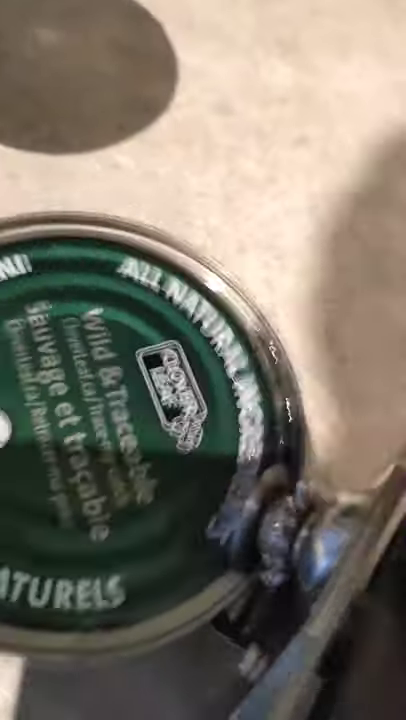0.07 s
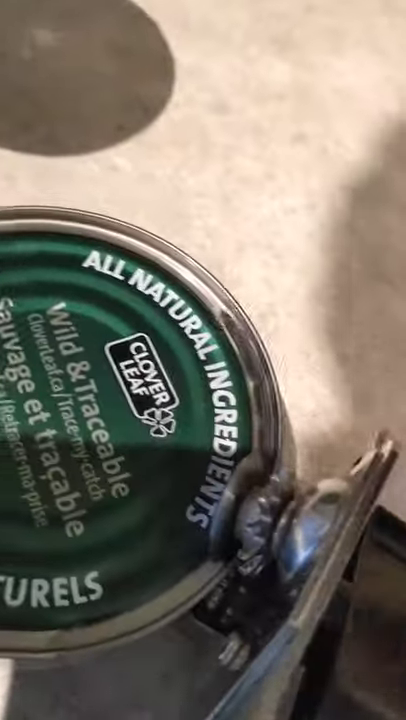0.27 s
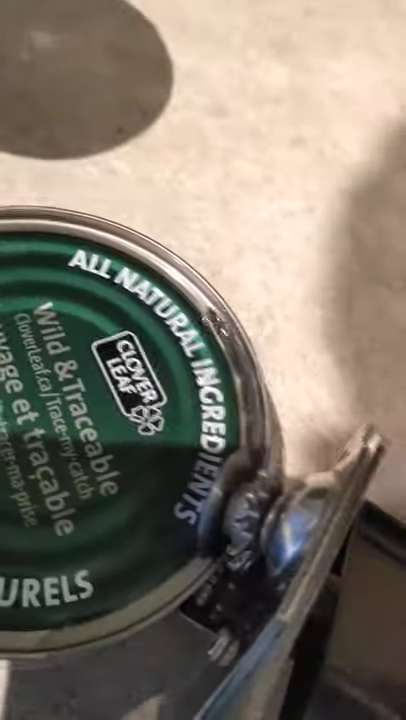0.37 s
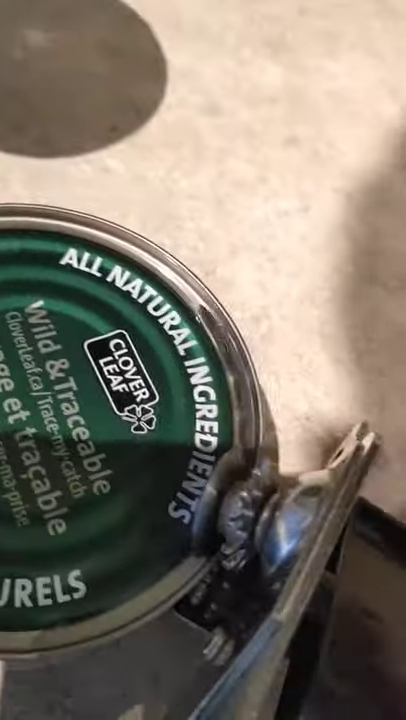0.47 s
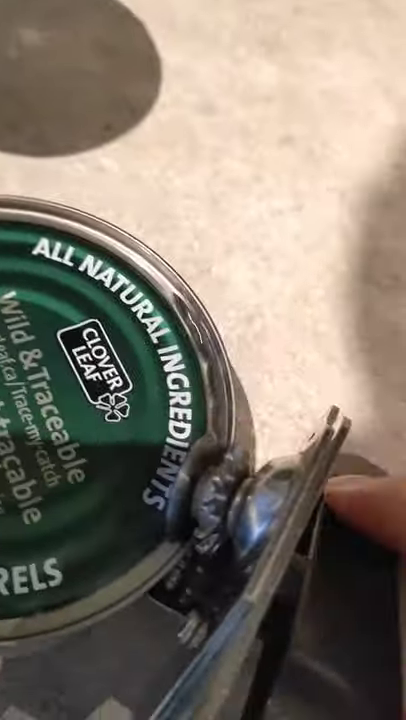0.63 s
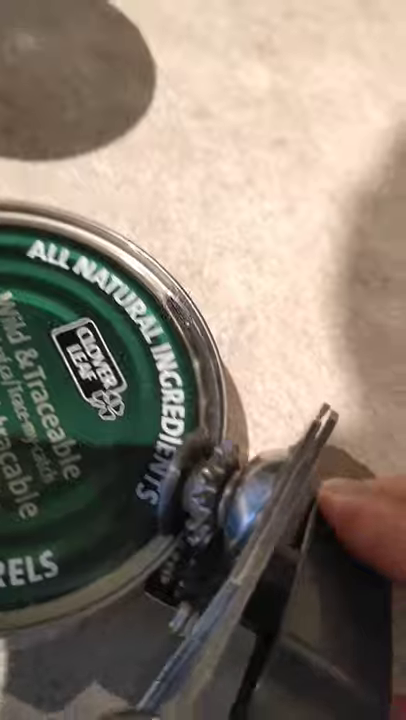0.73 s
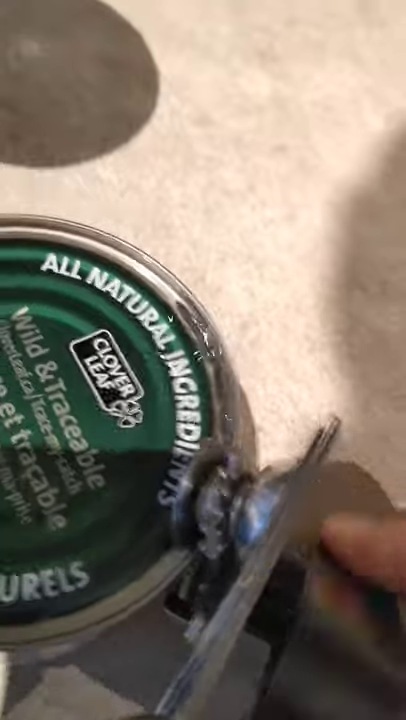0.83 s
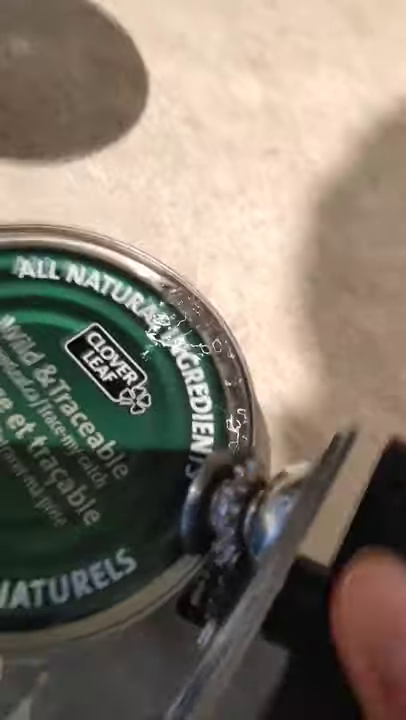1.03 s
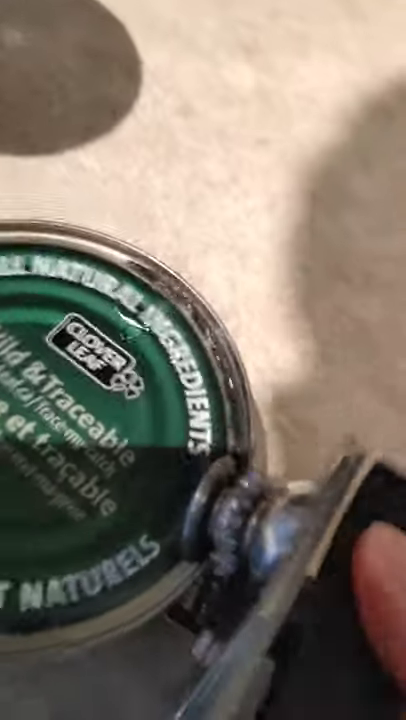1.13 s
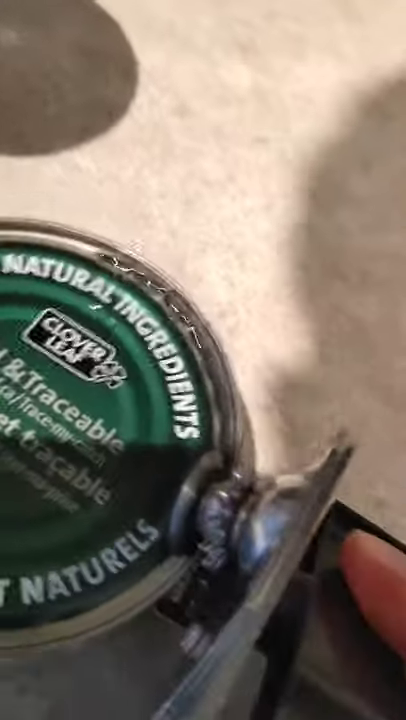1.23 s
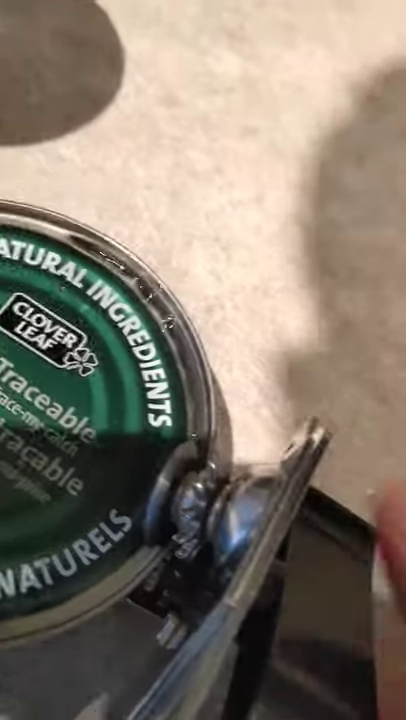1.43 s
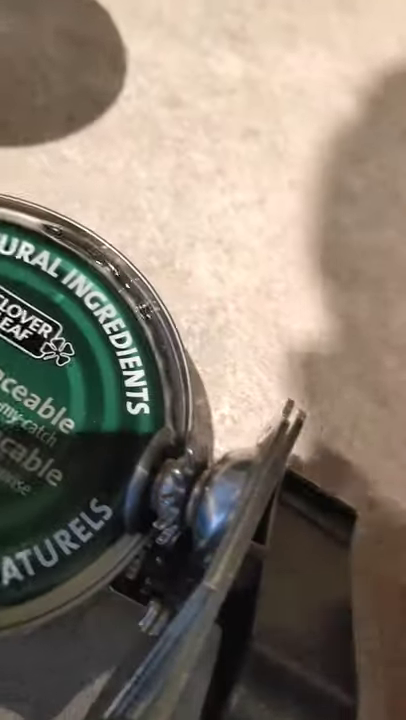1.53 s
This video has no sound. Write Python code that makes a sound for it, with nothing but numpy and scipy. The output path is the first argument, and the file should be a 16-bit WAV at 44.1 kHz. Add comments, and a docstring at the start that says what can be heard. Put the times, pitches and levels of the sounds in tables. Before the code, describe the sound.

A hand-turned can opener grinds through a tin lid with two loud snaps. In a pause the steel handle clinks and something rubs the microphone on the left, then a second turn crackles. The kitchen reverberates slightly.

```python
"""A hand-turned can opener works round a tin on a kitchen counter. In the first turn the wheel grinds
through the lid by stick-slip, and the tin crackles and twice snaps loudly, ringing the can's modes.
In the pause the loose steel handle clinks, something like a finger starts to rub and bump at the left
microphone, and the lid pops dully. A second turn grinds and crackles, and the handle clinks again.
Throughout, the kitchen reverberates and an appliance hums faintly."""
import sys
import numpy as np
from scipy import signal
from scipy.fft import rfft, irfft, next_fast_len
from scipy.io import wavfile
from scipy.ndimage import map_coordinates

SR = 44100
rng = np.random.default_rng(int(sys.argv[2]) if len(sys.argv) > 2 else 0)


def generate_wav(signal):
    """Clip the signal to [-1, 1] and save it as 16-bit WAV at the path in sys.argv[1]."""
    frames = np.transpose(np.atleast_2d(signal))
    scaled = np.clip(frames, -1, 1) * 32767
    pcm = np.round(scaled).astype(np.int16)
    wavfile.write(sys.argv[1], SR, pcm)


N = 70560

# force on the cutting wheel, as loudness: time_s, level_db
WHEEL_EFFORT = [(0, -43.5), (.05, -49), (.065, -39), (.12, -36.5), (.18, -45.5), (.23, -67), (.35, -46.5),
                (.39, -107), (.62, -63.5), (.67, -56.5), (.71, -90), (.88, -78), (.91, -49.5), (1.10, -46),
                (1.2, -42), (1.225, -46.5), (1.33, -59), (1.51, -121), (1.54, -51), (1.6, -72.5)]
# spectrum of shearing tin: frequency_hz, level_db
GRIND_SPECTRUM = [(35, -12.5), (100, 10.5), (350, -2), (1050, -1.5), (1700, -4.5), (2800, -9.5),
                  (3800, -6.5), (4900, -12.5), (7000, -5.5), (10000, -24.5), (16000, -34)]
# likeness of left and right for shearing and cracking: frequency_hz, coherence
TIN_COHERENCE = [(60, 0.22), (500, 0.64), (1600, 0.18), (5000, 0.044)]

def grinding():
    """Stick-slip friction: the wheel shears the tin in dense slips, louder as the force grows."""
    grains = np.array([slips(rate_hz=2400, spread_db=2) for _ in range(2)])
    level = amp(curve(WHEEL_EFFORT) + 4.54 * wobble(rate_hz=90))
    return level * coloured(paired(grains, TIN_COHERENCE), GRIND_SPECTRUM) * panned(11)


# the tin gives way: start_s, level_db
SNAPS = [(0.1249, -2.5), (0.1684, -3.5)]
# modes of the can and its lid: pitch_hz, level_db, t60_s
CAN_MODES = [(341, -18.5, 0.053), (468, -21.5, 0.038), (623, -15, 0.034), (982, -12, 0.038),
             (1248, -9.5, 0.027), (1442, -9, 0.032), (1852, -16.5, 0.043), (2215, -9, 0.016),
             (3860, -14.5, 0.017), (5430, -8.5, 0.02), (6870, -15.5, 0.018)]
# spectrum of a big tear: frequency_hz, level_db
TEAR_SPECTRUM = [(40, -30), (220, 0), (1300, 3.5), (2900, -4.5), (3900, -8), (4600, -9.5), (7000, -6.5),
                 (10000, -18), (16000, -35)]

def snaps():
    """Impulse excitation: a big tear cracks and sets the whole can ringing."""
    out = np.zeros((2, N))
    for start_s, level_db in SNAPS:
        body = ring(CAN_MODES, scatter_db=1, lag_s=.00009)
        tear = amp(-4.5) * crack(TEAR_SPECTRUM, t60_s=.016)
        add(out, start_s, amp(level_db - 4) * (body + tear))
    return out * panned(1.5)


# the wheel bites through a little more tin: start_s, ring_db, tick_db
BITES = [(.0582, -26.5, -28.5), (.0768, -37, -30), (.0978, -40, -29), (1.035, -37, -25),
         (1.111, -28, -29.5), (1.1187, -39, -24.5), (1.142, -28, -32), (1.1625, -32, -29.5),
         (1.171, -25.5, -23), (1.1845, -32, -28.5), (1.2032, -28, -23.5), (1.2105, -28, -23.5),
         (1.249, -32.5, -51), (1.2805, -35, -45)]
# modes of the rim under the wheel: pitch_hz, level_db, t60_s
RIM_MODES = [(643, -10, 0.041), (907, -8, 0.043), (1066, -11, 0.037), (1370, -9, 0.015)]
# spectrum of a sharp metal tick: frequency_hz, level_db
METAL_TICK_SPECTRUM = [(200, 4), (1200, -0.5), (2300, -12), (3800, 3.5), (5400, -9), (7000, -9),
                       (16000, -43)]
METAL_TICK_T60_S = .0083

def crackle():
    """Fracture in small steps: each bite ticks, then the rim resonates hollowly."""
    out = np.zeros((2, N))
    for start_s, ring_db, tick_db in BITES:
        hollow = ring(RIM_MODES, scatter_db=2, lag_s=.00009, attack_s=.0005)
        tick = crack(METAL_TICK_SPECTRUM, METAL_TICK_T60_S)
        add(out, start_s, amp(ring_db) * hollow + amp(tick_db) * tick)
    return out * panned(7)


# knocks of the handle: start_s, level_db, left_over_right_db, overtone_db
CLINKS = [(0.1197, -12, 18, -10.5), (.359, -27.5, 14, -6), (0.603, -34, 29.5, -8.5),
          (1.4642, -27.5, 15, -5), (1.4715, -21, 14, 1.5)]
# modes of the steel handle: pitch_hz, level_db, t60_s
HANDLE_MODES = [(1110, -19.5, 0.017), (2654, -19, 0.045), (3448, -3, 0.024), (4080, -8.5, 0.031),
                (5590, -1.5, 0.014), (8390, 1, 0.016)]
OVERTONES_ABOVE_HZ = 3750

def handle_clinks():
    """Free vibration after impact: the loose handle knocks in its play, ticks and rings."""
    out = np.zeros((2, N))
    for start_s, level_db, pan_db, overtone_db in CLINKS:
        modes = [(hz, db + overtone_db * (hz > OVERTONES_ABOVE_HZ), t60) for hz, db, t60 in HANDLE_MODES]
        steel = ring(modes, scatter_db=1, lag_s=.00006, attack_s=.00009)
        tick = amp(-4.5) * crack(METAL_TICK_SPECTRUM, METAL_TICK_T60_S)
        add(out, start_s, amp(level_db - 11) * panned(pan_db) * (steel + tick))
    return out


# the lid flexes: start_s, level_db
POPS = [(0.666, -46), (0.9024, -28)]
# modes of the flexing lid: pitch_hz, level_db, t60_s
LID_MODES = [(107, 0, 0.02), (930, 3.5, 0.033), (1050, -3.5, 0.031)]

def lid_pops():
    """Damped plate vibration: the lid flexes and its low modes die away in a dull pop."""
    out = np.zeros((2, N))
    for start_s, level_db in POPS:
        add(out, start_s, amp(level_db - 3.5) * ring(LID_MODES, scatter_db=1, lag_s=.0001))
    return out * panned(9)


# strokes of rubbing: centre_s, half_width_s, level_db
STROKES = [(0.348, 0.021, -38.5), (0.443, 0.017, -34.5), (0.494, 0.021, -43), (0.623, 0.032, -56.5),
           (0.782, 0.01, -51.5), (0.849, 0.019, -49), (0.931, 0.021, -33.5), (0.965, 0.015, -30.5),
           (1.052, 0.04, -36.5), (1.145, 0.041, -43.5), (1.406, 0.032, -48.5), (1.554, 0.024, -50.5)]
# spectrum of rubbing skin: frequency_hz, level_db
SKIN_SPECTRUM = [(40, -29), (110, 3.5), (900, -2.5), (4000, -4.5), (6800, -1), (9500, -11), (14500, -15),
                 (16500, -23)]

def rubbing():
    """Sliding friction: slips and hiss swell with each stroke and stay faint in between."""
    strokes = amp(-63) + sum(amp(db) * swell(centre_s, width_s) for centre_s, width_s, db in STROKES)
    grains = slips(rate_hz=5000, spread_db=3.5) + .25 * rng.standard_normal(N)
    flutter = amp(1.5 + 1.82 * wobble(rate_hz=120))
    return coloured(grains, SKIN_SPECTRUM) * strokes * flutter


# the rubbing catches and lets go: start_s, level_db
CATCHES = [(0.3523, -10.5), (0.5459, -21.5), (0.9493, -5), (0.9497, -4.5), (0.9692, 4.5), (0.9745, 0.5),
           (0.9779, -3), (1.1876, -11), (1.5477, -20)]
# spectrum of one release: frequency_hz, level_db
RELEASE_SPECTRUM = [(60, 6.5), (500, 6.5), (6500, 7.5), (10000, 1), (16000, -8)]

def rubbing_ticks():
    """Stick and release: each catch ends in a single impulse, heard as a dry tick."""
    impulses = np.zeros(N)
    for start_s, level_db in CATCHES:
        add(impulses, start_s, -amp([level_db]))
    response = lambda hz: amp(along(RELEASE_SPECTRUM, hz))
    mean_gain = response(np.linspace(0, SR / 2, N)).mean()
    return filtered(impulses, response) / mean_gain


# bumps of the same contact: centre_s, level_db
BUMPS = [(0.456, -33), (0.968, -29), (1.044, -28.5), (1.119, -28.5)]

def bumps():
    """Soft impact: a yielding contact gives a short swell of mostly low-frequency noise."""
    spectrum = [(30, -9), (110, 1.5), (300, -.5), (600, -12.5), (5000, -44)]  # frequency_hz, level_db
    pressure = sum(amp(db) * swell(centre_s, half_width_s=.0049) for centre_s, db in BUMPS)
    return pressure * coloured(rng.standard_normal(N), spectrum)


# reverberation time of the kitchen: frequency_hz, t60_s
ROOM_DECAY = [(100, 0.34), (500, 0.41), (3000, 0.59), (14000, 0.48)]
# spectral weighting of the reverberation: frequency_hz, gain_db
ROOM_GAIN = [(60, -1), (200, -3), (1900, -9), (3200, -12.5), (14000, -14)]

def kitchen(source):
    """Reverberation: a diffuse tail decays exponentially, each frequency at its own rate."""
    diffuse = paired(rng.standard_normal((2, SR)), coherence=[(150, 1.0), (600, .59), (1500, .023)])
    hz, t, bands = signal.stft(diffuse, SR, nperseg=256)
    t60_s = along(ROOM_DECAY, hz)[:, None]
    equal_energy = np.sqrt(2 * np.log(1000) / (t60_s * SR))
    tail = signal.istft(bands * amp(-60 * t / t60_s) * equal_energy, SR, nperseg=256)[1]
    tail = filtered(tail, lambda hz: amp(along(ROOM_GAIN, hz)))
    delayed = np.pad(source.mean(axis=0), (130, 0))  # about 3 ms
    return signal.fftconvolve(delayed[None], tail, axes=1)[:, :N]


# spectrum of the room noise: frequency_hz, level_db
AIR_SPECTRUM = [(25, -40), (60, 0), (115, 1.5), (170, -10), (400, -10), (1000, -17), (3000, -68),
                (16000, -68)]
AIR_DB, HUM_HZ, HUM_DB = -58.5, 119.2, -57.5

def background():
    """Ambient noise: a low rumble, and an appliance hum that wavers by phase modulation."""
    noise = paired(rng.standard_normal((2, N)), coherence=[(100, .95), (1000, .51)])
    air = coloured(noise, AIR_SPECTRUM) * panned(2.9)
    hum = np.sin(2 * np.pi * HUM_HZ * np.arange(N) / SR + .7 * wobble(rate_hz=4.6))
    return amp(AIR_DB) * air + amp(HUM_DB) * hum


def slips(rate_hz, spread_db):
    """Poisson process: tiny impulses at random moments, a few larger than the rest."""
    sizes = amp(spread_db * np.minimum(rng.exponential(size=N), 5))
    slipping = rng.random(N) < rate_hz / SR
    return unit(slipping * sizes * rng.choice([-1, 1], N))


def ring(modes, scatter_db, lag_s, attack_s=.00005):
    """Modal superposition: damped sines, excited a little differently by each blow."""
    hz, db, t60_s = np.transpose(modes)[:, :, None, None]
    t = np.arange(SR // 6) / SR
    right_lag = np.minimum(2 * np.pi * hz * lag_s, np.pi / 2) * np.array([[0], [1]])
    signs = (-1) ** np.arange(len(modes)).reshape(hz.shape)
    gain = signs * amp(db + scatter_db * rng.standard_normal(hz.shape))
    partials = gain * amp(-60 * t / t60_s) * np.sin(2 * np.pi * hz * t - right_lag)
    return partials.sum(axis=0) * (1 - np.exp(-t / attack_s))


def crack(spectrum, t60_s):
    """Broadband transient: a noise burst with a fast exponential decay."""
    t = np.arange(SR // 6) / SR
    noise = paired(rng.standard_normal((2, len(t))), TIN_COHERENCE)
    return coloured(noise, spectrum) * amp(-60 * t / t60_s)


def amp(db):
    """Decibels to gain."""
    return 10 ** (np.asarray(db) / 20)


def unit(x):
    """Normalisation to rms 1."""
    return x / np.sqrt(np.mean(x ** 2) + 1e-20)


def along(points, hz):
    """Interpolation of (frequency_hz, value) points on a log axis."""
    knots_hz, values = np.transpose(points)
    return np.interp(np.log(hz + 1), np.log(knots_hz + 1), values)


def curve(rows):
    """Linear interpolation of (time_s, value) rows at every sample."""
    return np.interp(np.arange(N) / SR, *np.transpose(rows))


def swell(centre_s, half_width_s):
    """Gaussian envelope."""
    return np.exp(-.5 * ((np.arange(N) / SR - centre_s) / half_width_s) ** 2)


def wobble(rate_hz):
    """Random modulation: a spline through rate_hz knots a second."""
    return map_coordinates(rng.standard_normal(2000), [np.arange(N) * rate_hz / SR], mode="wrap")


def filtered(x, response):
    """Linear filtering: the spectrum of x times a frequency response."""
    length = x.shape[-1]
    padded = next_fast_len(length + 8192)
    return irfft(rfft(x, padded) * response(np.fft.rfftfreq(padded, 1 / SR)), padded)[..., :length]


def coloured(x, spectrum):
    """Spectral shaping of x, at rms 1."""
    return unit(filtered(x, lambda hz: amp(along(spectrum, hz))))


def panned(left_over_right_db):
    """Level difference as left and right gains."""
    return amp(np.array([[left_over_right_db], [-left_over_right_db]]) / 2)


def paired(x, coherence):
    """Mid-side mixing of two unrelated signals to the given (frequency_hz, coherence) points."""
    angle = lambda hz: np.arccos(np.clip(along(coherence, hz), -1, 1)) / 2
    mid, side = filtered(x, lambda hz: np.array([np.cos(angle(hz)), np.sin(angle(hz))]))
    return unit(np.array([mid + side, mid - side]))


def add(track, start_s, sound):
    """Mix a sound into a track at start_s."""
    part = track[..., max(round(start_s * SR), 0):][..., :sound.shape[-1]]
    part += sound[..., :part.shape[-1]]


def scene():
    """Superposition: the opener, its reverberation, the contact on the left and the background."""
    opener = grinding() + snaps() + crackle() + handle_clinks() + lid_pops()
    reverberation = kitchen(opener)
    contact = (rubbing() + rubbing_ticks() + bumps()) * amp([[0], [-58]])  # left_db, right_db
    return opener + reverberation + contact + background()


def record(dry):
    """Soft saturation rounds off the highest peaks; a low-pass limits the band."""
    ceiling, cutoff_hz = .9, 16200
    rounded = dry / (1 + np.abs(dry / ceiling) ** 6) ** (1 / 6)
    return filtered(rounded, lambda hz: hz < cutoff_hz)


dry = scene()
out = record(dry)
generate_wav(out)
```